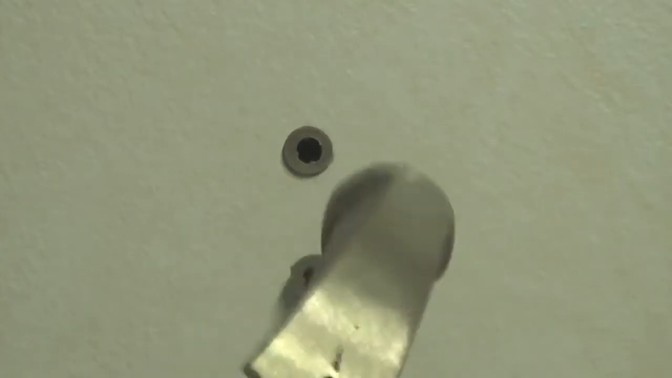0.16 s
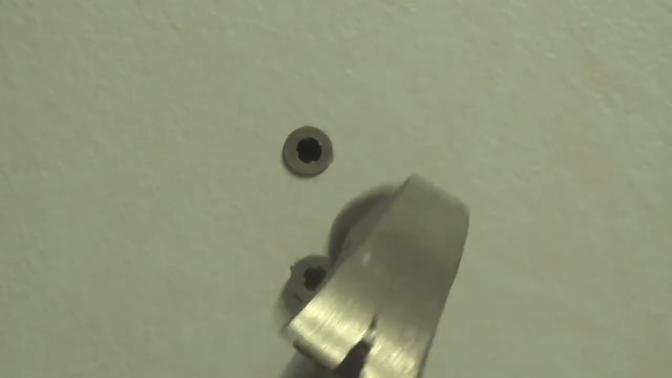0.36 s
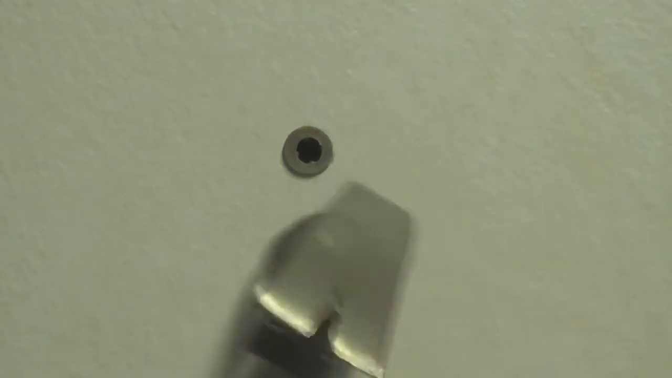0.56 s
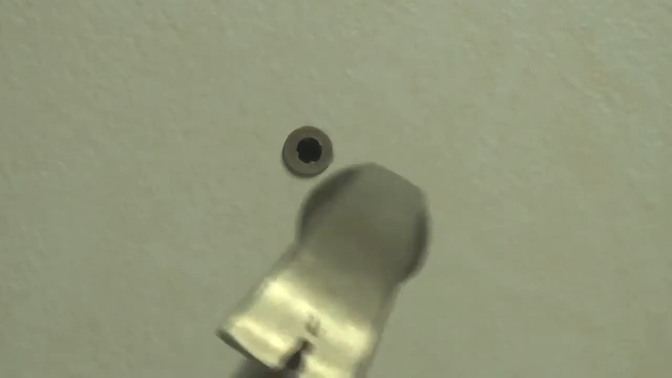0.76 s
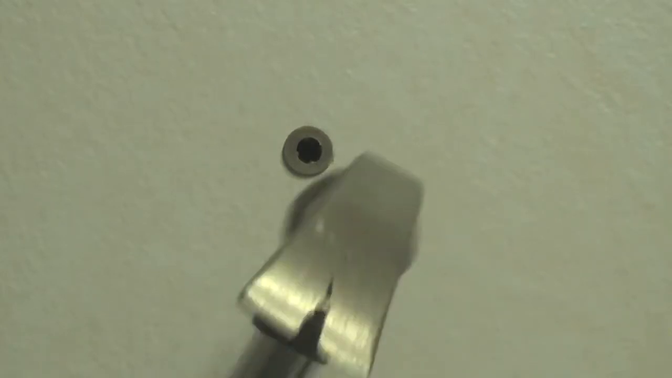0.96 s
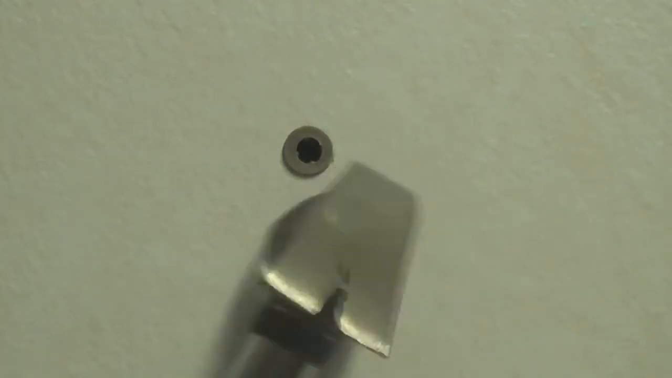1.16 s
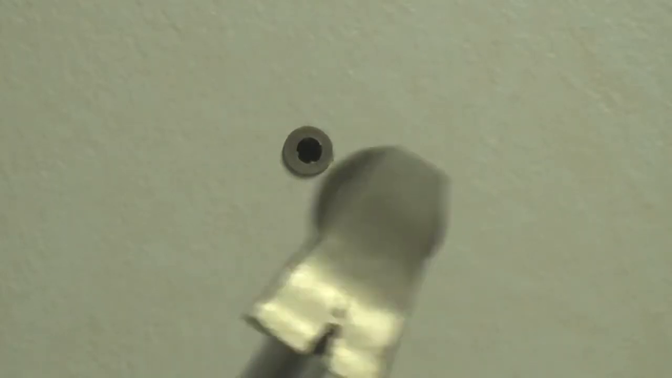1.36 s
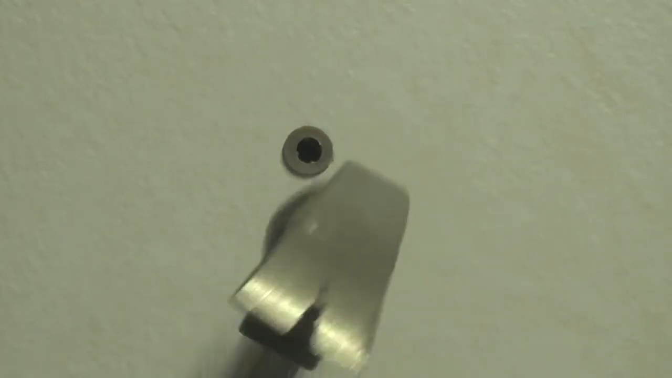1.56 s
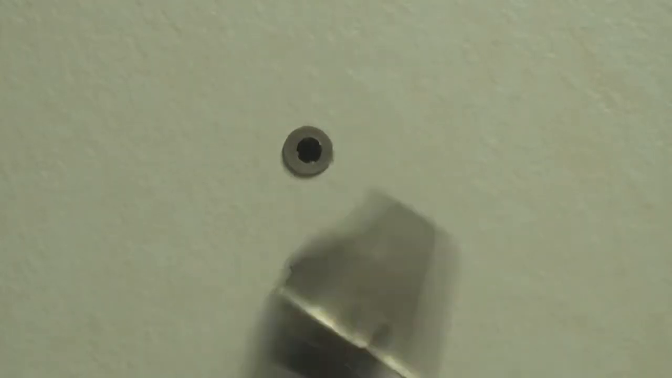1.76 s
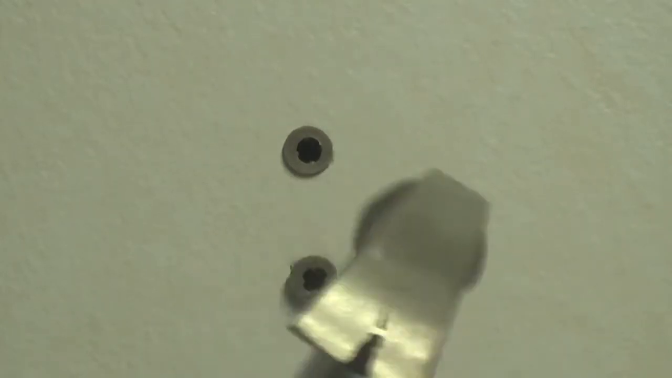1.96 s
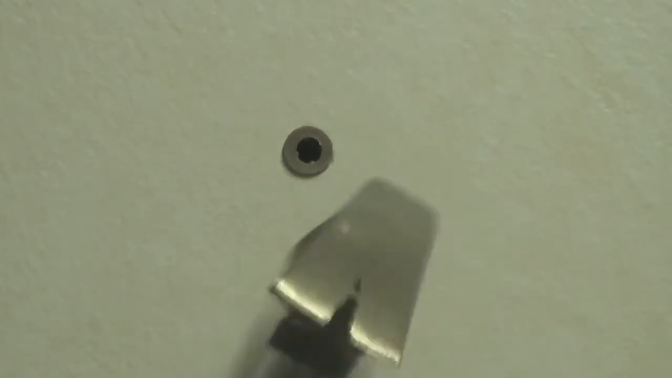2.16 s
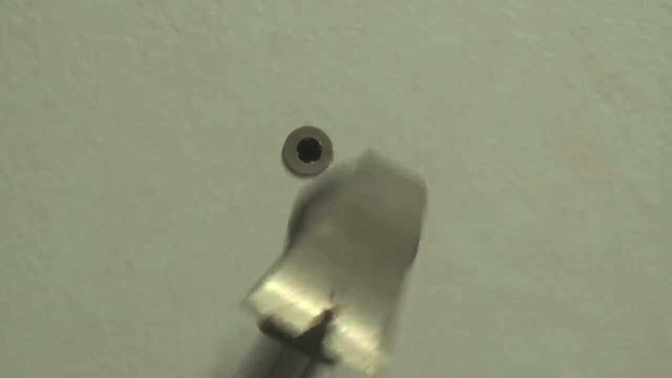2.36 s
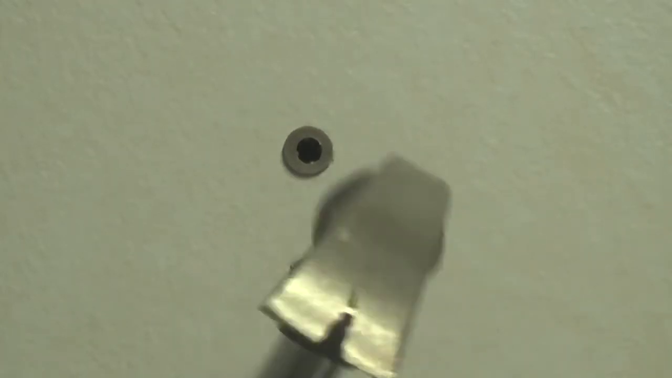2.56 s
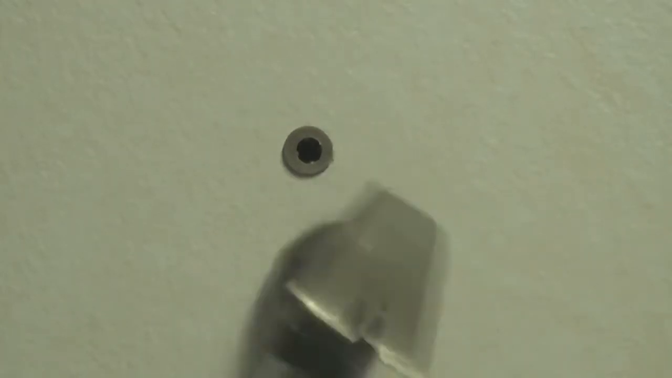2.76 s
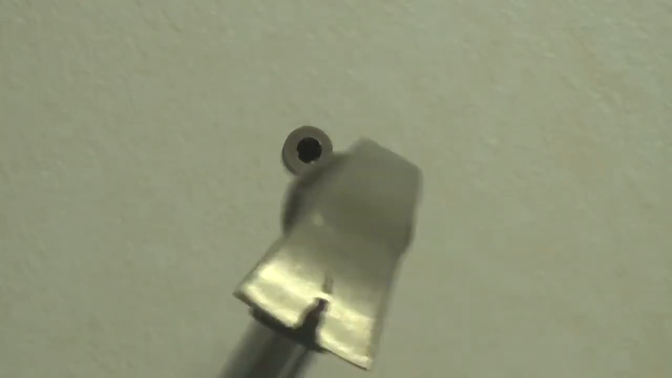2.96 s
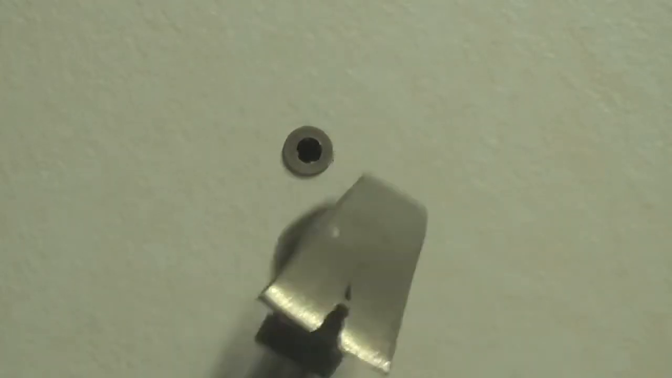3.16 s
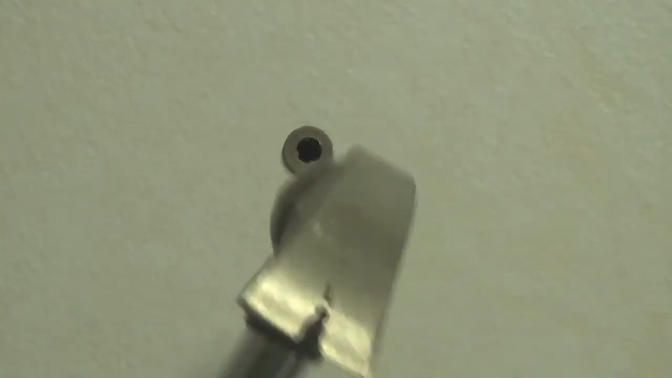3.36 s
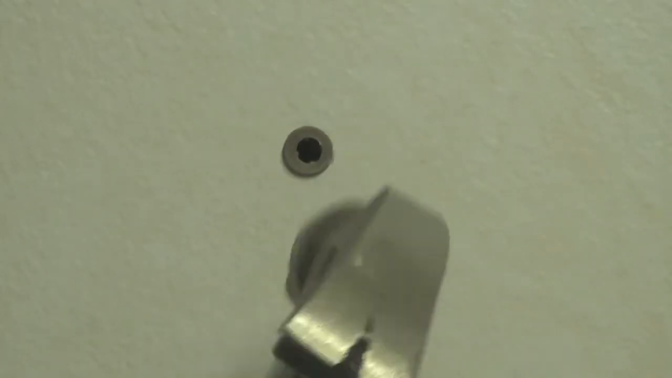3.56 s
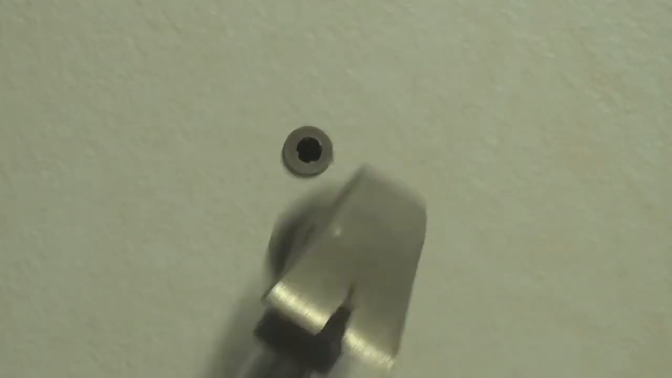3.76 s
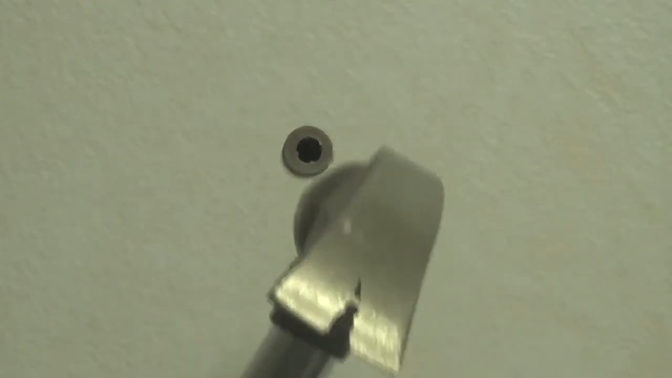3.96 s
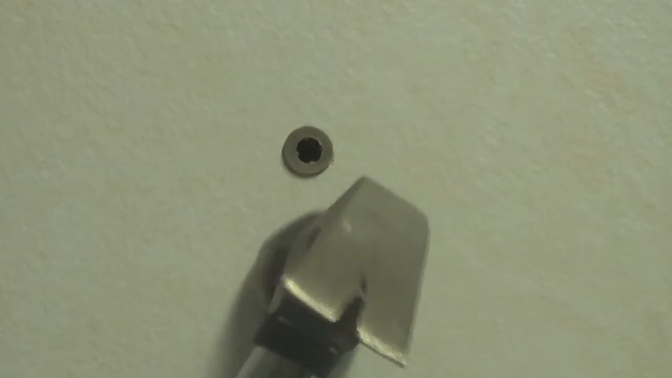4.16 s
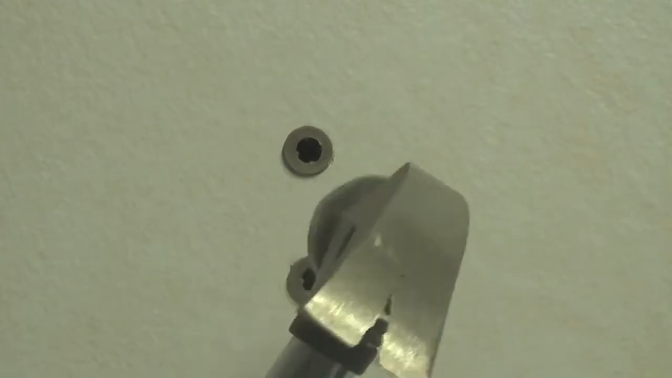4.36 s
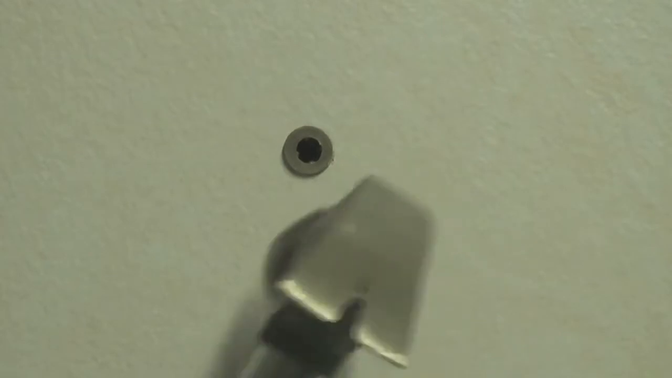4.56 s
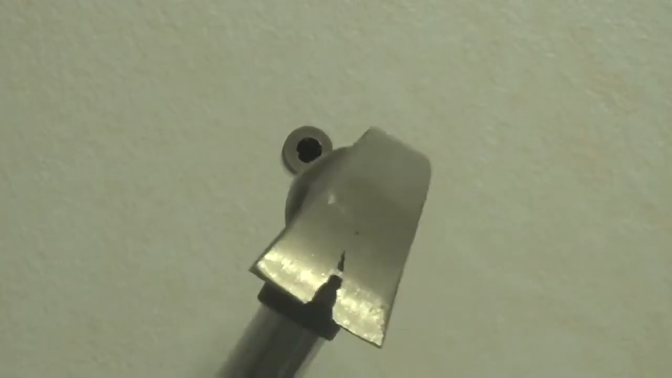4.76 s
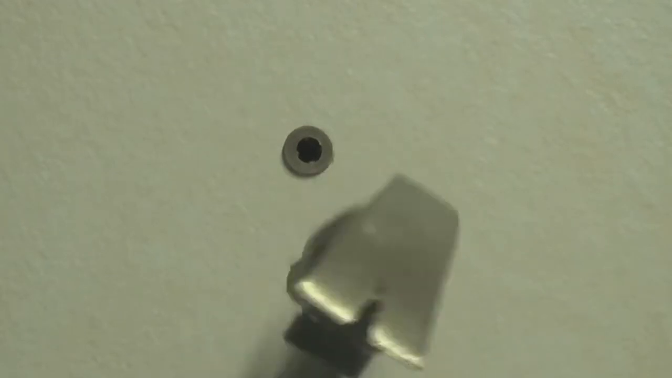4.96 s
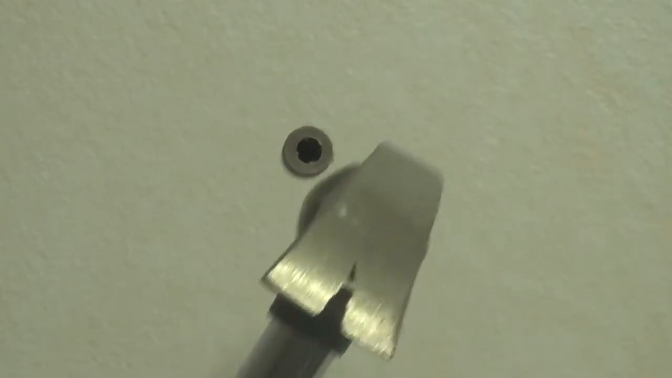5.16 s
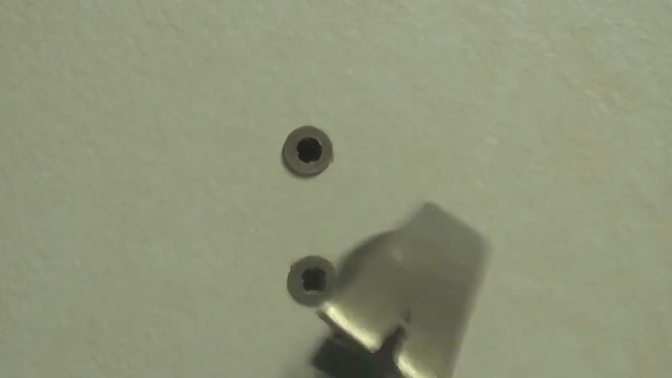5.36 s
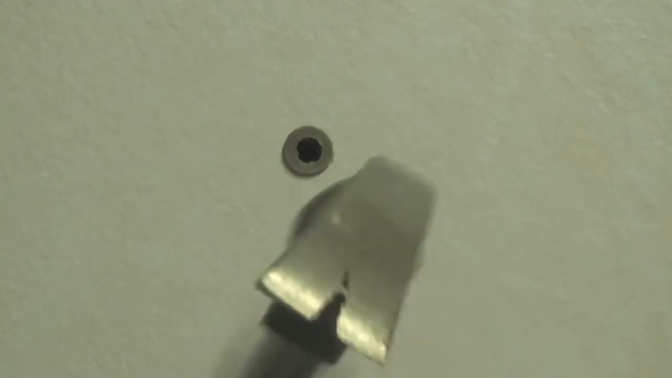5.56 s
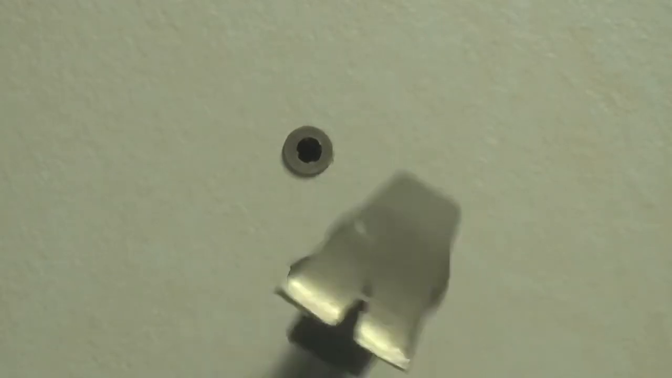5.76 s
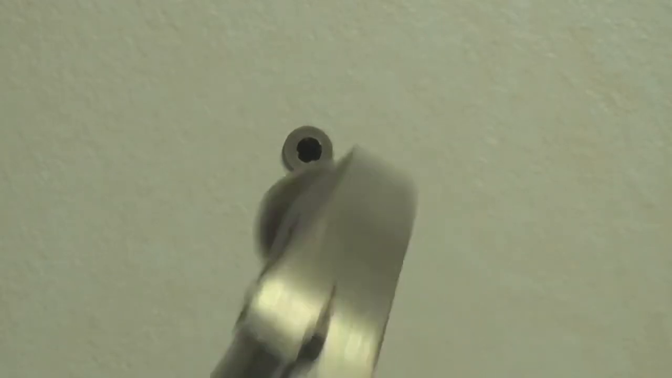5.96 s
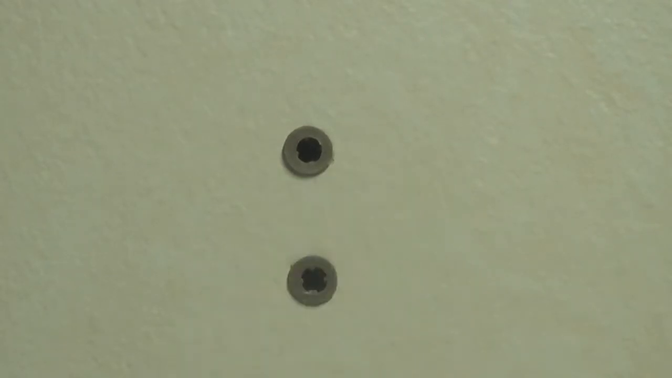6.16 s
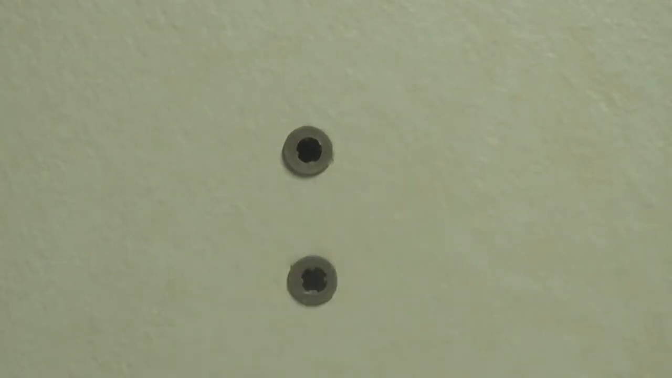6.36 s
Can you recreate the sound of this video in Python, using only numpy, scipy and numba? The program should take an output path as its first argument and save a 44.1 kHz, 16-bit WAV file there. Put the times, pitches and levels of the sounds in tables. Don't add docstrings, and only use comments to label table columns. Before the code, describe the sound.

A small metal hammer taps a plastic anchor into a hollow wall, steady hard clacking knocks ringing in a bare room, then faint hiss.

```python
import sys
import numpy as np
from scipy import signal
from scipy.fft import rfft, irfft
from scipy.io import wavfile
from scipy.ndimage import uniform_filter1d
from numba import njit

SR = 44100
rng = np.random.default_rng(int(sys.argv[2]) if len(sys.argv) > 2 else 0)


def attenuation_scalar(level_db):
    decades = np.asarray(level_db, float) / 20
    return 10 ** decades


def unload_wav(signal):
    wavfile.write(
        sys.argv[1],
        SR,
        np.round(np.clip(np.atleast_2d(signal).T, -1, 1) * 32767).astype(np.int16),
    )


N = 286340

# (time [s], level [dB], hardness [dB], chatter notch [Hz], chatter share [0-1])
BLOWS = [(-.118, 5, 0, 1800, 0.1), (0.176, 4, 1, 3140, 0.19), (.47, -.5, 4, 3300, 0.72),
         (0.7718, 3, 4.5, 2950, 0.12), (1.074, 0.5, 4, 3830, .48), (1.3667, 3.5, 1.5, 2200, 0.08),
         (1.665, 1.5, 7, 2020, 0.21), (1.9775, -3.5, 11, 4530, 0.51), (2.3024, -4, 8.5, 3520, 0.61),
         (2.627, -1, 2.5, 2220, 0.11), (2.9791, -4, 6.5, 2850, 0.68), (3.3051, -1.5, 10, 1720, 0.14),
         (3.6817, -4, -1, 3630, 0.41), (4.011, 0.5, -2.5, 2090, 0.17), (4.3771, -3, 1.5, 2500, 0.62),
         (4.7243, 1.5, -1.5, 1880, 0.21), (5.094, .5, 2.5, 1960, 0.14), (5.4747, 0, 1.5, 8000, 0.36),
         (5.8342, -1, -2.5, 2540, 0.32)]
# (time [s], seated [0-1])
COLLAR_SEATING = [(0, 0.16), (2.65, 0), (3.7, 0), (4.4, 0.72), (5.1, 0.75), (5.84, 1)]
# (delay [ms], level [dB])
CLICK_ARRIVALS = [(0, -10.5), (.45, -21), (1.25, -4), (1.4, -3), (1.75, -16), (2.5, -4.5), (3.6, -13.5),
                  (5.2, -14)]
# (frequency [Hz], level [dB], T60 [s])
BOARD_MODES = [(632, -25, 0.41), (716, -22, 0.5), (770, -29, 0.34), (784.4, -22, 0.32), (888, -33, 0.47),
               (892, -26.5, 0.29), (960, -25, 0.27), (1150, -34.5, 0.44), (1203, -30, 0.34),
               (1257, -18, 0.066), (1413, -30, 0.26), (1595, -23, 0.28), (2430, -28, 0.39)]
# (frequency [Hz], T60 [s], left swing [signed gain], right swing [signed gain])
ROOM_MODES = [(127.7, 0.43, 0.072, 0.066), (149.8, 0.79, 0.0064, 0.0049), (161, 0.4, 0.041, 0.048),
              (208.9, 0.38, 0.094, 0.019), (222.7, 0.44, -0.078, 0.012), (234, 0.54, 0.042, 0.045),
              (251, 0.3, -0.02, -0.094), (274.4, 0.27, -0.24, -0.06), (293.4, 0.49, -0.092, -0.15),
              (307, 0.53, 0.049, 0.081), (349.2, 0.76, 0.00069, -0.011), (369.2, 0.37, 0.23, 0.3),
              (375.1, 0.46, -0.11, -0.15), (390, 0.48, -0.21, -0.045), (413.3, 0.36, 0.24, -0.13),
              (405, 0.76, -0.039, -0.039), (431.4, 0.24, -0.44, -0.46), (448.8, 0.43, 0.068, 0.28),
              (460.7, 0.45, -0.23, -0.27), (474, 0.42, 0.35, 0.38), (504.3, 0.3, -0.33, -0.21),
              (515.3, 0.25, -0.17, -0.43), (522.3, 0.54, -0.1, -0.0027), (561.7, 0.5, 0.032, 0.12),
              (582, 0.26, 0.18, 0.011), (622, 0.33, -0.19, -0.0022), (652, 0.17, 0.11, 0.11),
              (667.5, 0.28, -0.028, -0.15), (716, 0.5, 0.013, 0.052), (713, 0.51, 0.027, 0.012)]
# (frequency [Hz], density [dB per Hz], T60 [s], side minus mid [dB])
ECHO_BANDS = [(30.8, -26.5, 0.55, 3.5), (91, -33.5, 0.47, -1.5), (306, 1, 0.38, -5), (610, -16, 0.63, -4.5),
              (823, -8, 0.37, -6.5), (1084, -15, 0.48, -6), (1336, -9, 0.38, -5), (2108, -17, 0.39, -7.5),
              (2192, -11.5, 0.35, -4.5), (3040, -20, 0.41, -7.5), (3520, -22, 0.39, -9.5),
              (5530, -36, 0.43, -6), (6940, -37.5, 0.3, -6.5), (11160, -45.5, 0.37, -21),
              (14000, -56, 0.15, -18), (15400, -80, 0.14, -8)]
# (time [s], level [dB])
SLEEVE_RUBS = [
    (.93, -50),
    (1.065, -55),
    (1.22, -51),
    (1.37, -56),
]
# (frequency [Hz], density [dB per Hz])
CLOTH_SPECTRUM = [(1500, -9), (3000, 8), (6500, 3), (10000, -5), (13000, -7), (15500, -26)]
# (frequency [Hz], density [dB per Hz])
RUMBLE_SPECTRUM = [(15, -6), (40, -4), (70, -22), (110, 2.5), (160, -28)]
# (time [s], level [dB])
ARM_SWAY = [(0, 7), (3, 4), (3.8, 5), (6, 0), (6.2, -12)]
# (frequency [Hz], density [dB per Hz])
HISS_SPECTRUM = [(18, -41), (30, -31), (120, 1), (284, -12), (748, -6), (972, -13.5), (1770, -11),
                 (2020, -15), (15600, -29.5)]
# (frequency [Hz], rms level [dB])
WHINE_TONES = [
    (7854, -90.5),
    (15680, -78),
]

LEAD = SR // 4
ROOM_S = 0.9


def contact_push(f, level_db, hard_db, seated, chatter):
    hard_hz = 1800
    push = attenuation_scalar(level_db) * (1 + 1j * attenuation_scalar(hard_db) * f / hard_hz) / (1 + 1j * f / hard_hz)
    edge_db = 1.5 - 0.53 * hard_db - 6.5 * chatter
    push = push * attenuation_scalar(edge_db / (1 + (8000 / (f + 1)) ** 4))
    knock_hz, knock_octaves = 734, 0.42
    knock = np.exp(-(np.log2((f + 1) / knock_hz) / knock_octaves) ** 2)
    return push * attenuation_scalar((-1.5 + 7 * seated) * knock)


def later_contact(f, notch_hz, share, top):
    return 1 + share * np.exp(-1j * np.pi * f / notch_hz) / (1 + (f / notch_hz / top) ** 2)


def anchor_swallow(f, chatter_hz, chatter):
    q = 3.2
    off = q * ((f + 1) / chatter_hz - chatter_hz / (f + 1))
    return 1 - chatter / (1 + 1j * off)


def loose_rattle(size):
    decay_s, wobble_db = 0.0036, -21.5
    rattle = rng.standard_normal(size) * np.exp(-np.arange(size) / (decay_s * SR))
    return 1 + attenuation_scalar(wobble_db) * rfft(rattle) / np.linalg.norm(rattle)


def blows():
    size, early = 1024, 128
    force = np.zeros(N + LEAD + 4096)
    f = np.arange(size // 2 + 1) * SR / size
    for s, level_db, hard_db, chatter_hz, chatter in BLOWS:
        at = s * SR + LEAD
        seated = np.interp(s, *np.transpose(COLLAR_SEATING))
        push = contact_push(f, level_db, hard_db, seated, chatter)
        rebound = (0.36 - 0.0254 * hard_db) * (1 - 0.99 * seated)
        rebound_hz = 586 * 2 ** (0.46 * seated)
        push = push * later_contact(f, chatter_hz, chatter, 1.1)
        push = push * later_contact(f, rebound_hz, rebound, 2.9)
        push = push * anchor_swallow(f, chatter_hz, chatter)
        push = push * loose_rattle(size)
        push = irfft(push * np.exp(-2j * np.pi * f * (early + at % 1) / SR), size)
        start = int(at) - early
        force[start:start + size] += push
    return force


def clicks(t):
    level_db, edge_db = 2.5, -8.5
    arrivals = np.zeros(len(t))
    ms, db = np.transpose(CLICK_ARRIVALS)
    arrivals[(ms * SR / 1000).astype(int)] = attenuation_scalar(db + level_db)
    body = signal.sosfilt(signal.butter(2, [1620, 5000], "band", fs=SR, output="sos"), arrivals)
    edge = signal.sosfilt(signal.butter(2, [6000, 13000], "band", fs=SR, output="sos"), arrivals)
    soften = signal.butter(4, 12000, fs=SR, output="sos")
    return signal.sosfilt(soften, body + attenuation_scalar(edge_db) * edge)


def board_ring(t):
    hz, db, t60 = (column[:, None] for column in np.transpose(BOARD_MODES))
    sense = np.sign(rng.standard_normal(hz.shape))
    return np.sum(sense * np.sin(2 * np.pi * hz * t) * attenuation_scalar(db - 60 * t / t60), axis=0)


def room_ring(t):
    level_db = 0.5
    hz, t60, left, right = (column[:, None] for column in np.transpose(ROOM_MODES))
    ring = np.sin(2 * np.pi * hz * t) * attenuation_scalar(level_db - 60 * t / t60)
    return np.array([np.sum(left * ring, axis=0), np.sum(right * ring, axis=0)])


def echoes(t):
    level_db = -10.5
    hz, _, t60, side_db = np.transpose(ECHO_BANDS)
    mid = rfft(shaped(ECHO_BANDS, len(t)))
    side = rfft(shaped(ECHO_BANDS, len(t)))
    octave = np.log2(np.arange(len(mid)) / ROOM_S + 1)
    out = 0
    for centre in np.arange(4, 14.4, 1 / 3):
        mask = np.clip(1 - 3 * abs(octave - centre), 0, 1)
        fade = attenuation_scalar(-60 * t / np.interp(centre, np.log2(hz), t60))
        wide = attenuation_scalar(np.interp(centre, np.log2(hz), side_db)) * np.array([[1], [-1]])
        out = out + fade * irfft(mask * (mid + wide * side), len(t))
    return attenuation_scalar(level_db) * out


def wall_and_room():
    build_s, left_db = 0.0028, -1.37
    t = np.arange(int(ROOM_S * SR)) / SR
    field = board_ring(t) + room_ring(t) + echoes(t)
    response = field * (1 - np.exp(-t / build_s)) + clicks(t)
    lows = signal.sosfilt(signal.butter(1, 1800, fs=SR, output="sos"), response)
    return response + (attenuation_scalar(np.array([[left_db], [-left_db]]) / 2) - 1) * lows


def sleeve():
    rise, fall = 157, 167
    t = np.arange(N) / SR
    swell = sum(attenuation_scalar(db - np.maximum(rise * (s - t), fall * (t - s))) for s, db in SLEEVE_RUBS)
    grain = attenuation_scalar(1.5 * uniform_filter1d(rng.standard_normal(N), size=200) * np.sqrt(200))
    return attenuation_scalar(7.0) * swell * grain * shaped(CLOTH_SPECTRUM, N)


def handling_rumble():
    t = np.arange(N) / SR
    return attenuation_scalar(-61 + np.interp(t, *np.transpose(ARM_SWAY))) * shaped(RUMBLE_SPECTRUM, N)


def camera_hiss():
    shared = shaped(HISS_SPECTRUM, N)
    apart = 0.48 * shaped(HISS_SPECTRUM, N) * np.array([[1], [-1]])
    return attenuation_scalar(-60.5) * (shared + apart)


def camera_whine():
    t = np.arange(N) / SR
    return sum(np.sqrt(2) * attenuation_scalar(db) * np.sin(2 * np.pi * hz * t) for hz, db in WHINE_TONES)


def shaped(points, size):
    hz, db = np.transpose(points)[:2]
    f = np.arange(size // 2 + 1) * SR / size + 1
    colour = attenuation_scalar(np.interp(np.log(f), np.log(hz), db, right=-120))
    x = irfft(rfft(rng.standard_normal(size)) * colour, size)
    return x / x.std()


def scene():
    taps = signal.fftconvolve(blows()[None], wall_and_room(), axes=1)[:, LEAD:LEAD + N]
    return taps + sleeve() + handling_rumble() + camera_hiss() + camera_whine()


@njit
def follow(x, attack, release):
    y, e = np.empty(len(x)), 0.
    for i in range(len(x)):
        e += (x[i] - e) * (attack if x[i] > e else release)
        y[i] = e
    return y


def limiter(x):
    threshold_db, ratio, attack_s, release_s, look = -8, 7.1, 0.00023, 0.013, 40
    peak = follow(np.abs(x).max(axis=0), 1 / (1 + attack_s * SR), 1 / (1 + release_s * SR))
    ahead = np.append(peak[look:], np.zeros(look))
    return x * np.minimum(1, attenuation_scalar(threshold_db) / (ahead + 1e-9)) ** (1 - 1 / ratio)


def low_pass(x):
    return signal.sosfilt(signal.butter(12, 15700, fs=SR, output="sos"), x)


def record(dry):
    bass_cut = signal.butter(1, 45, "high", fs=SR, output="sos")
    mix = signal.sosfilt(bass_cut, limiter(dry))
    return low_pass(mix)


dry = scene()
out = record(dry)
unload_wav(out)
```